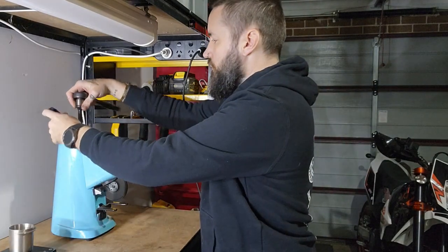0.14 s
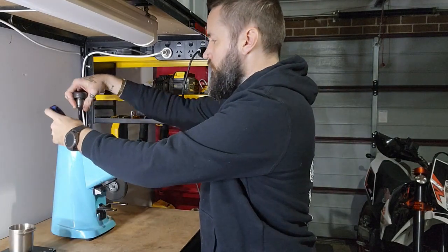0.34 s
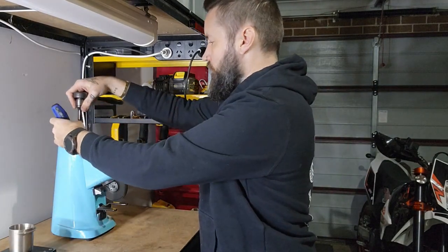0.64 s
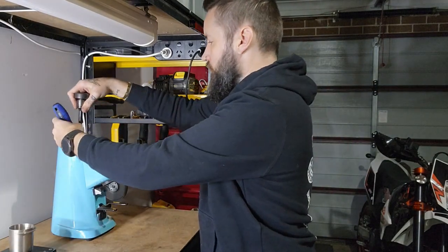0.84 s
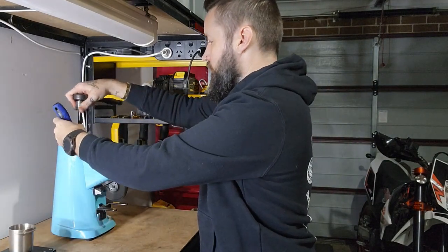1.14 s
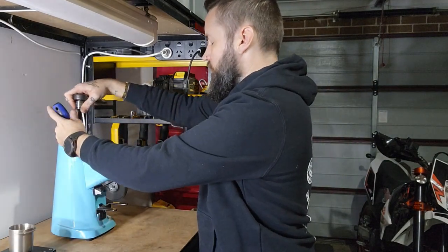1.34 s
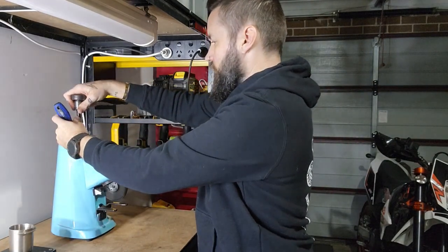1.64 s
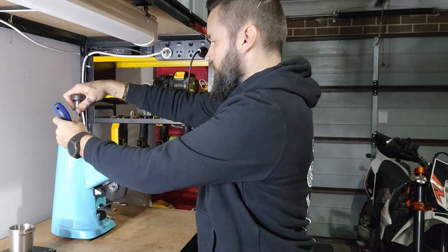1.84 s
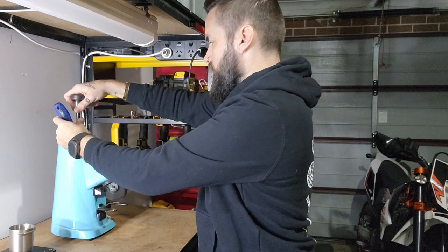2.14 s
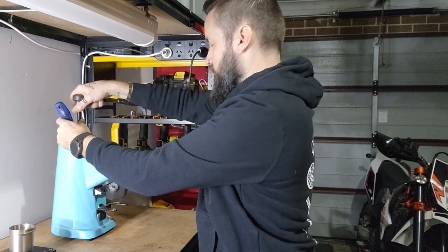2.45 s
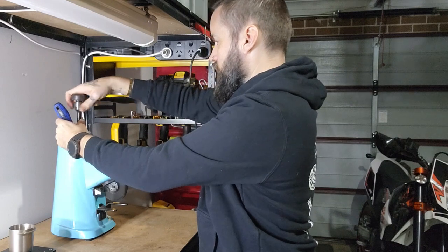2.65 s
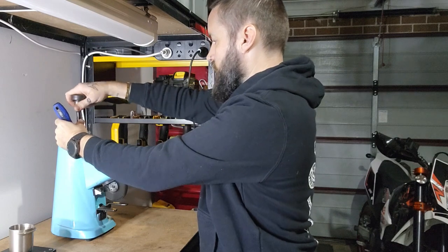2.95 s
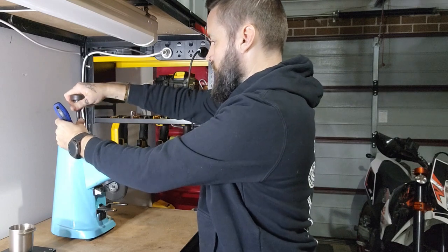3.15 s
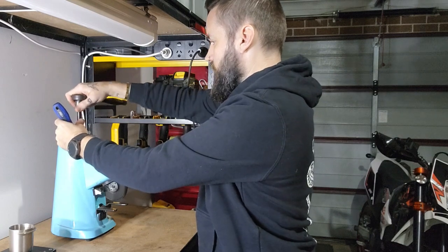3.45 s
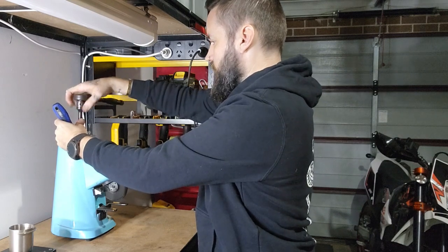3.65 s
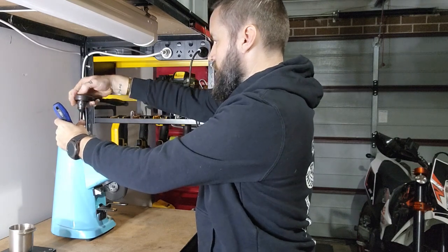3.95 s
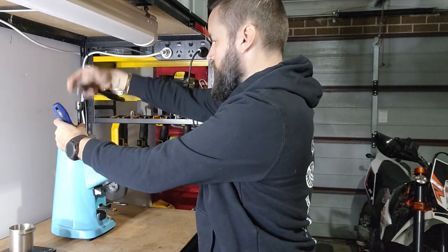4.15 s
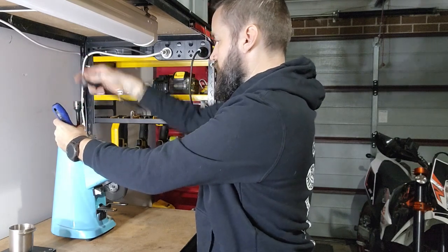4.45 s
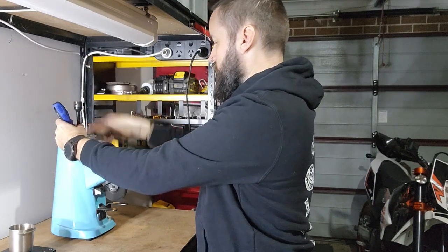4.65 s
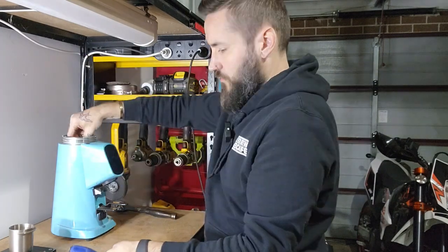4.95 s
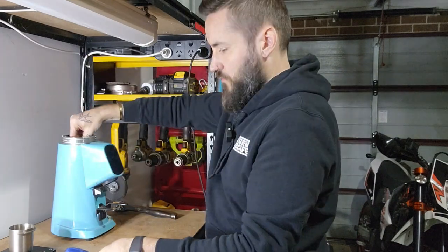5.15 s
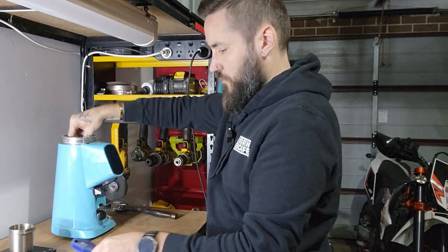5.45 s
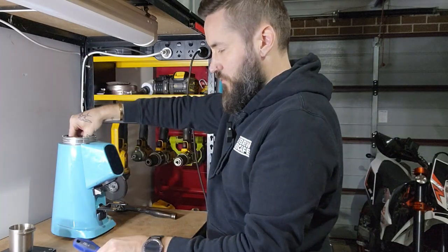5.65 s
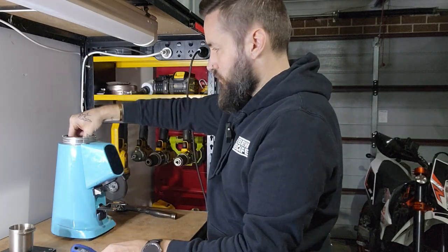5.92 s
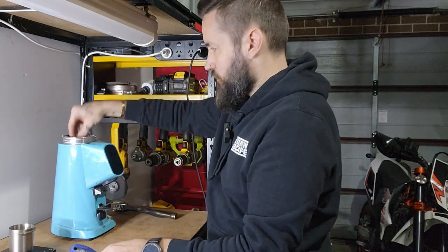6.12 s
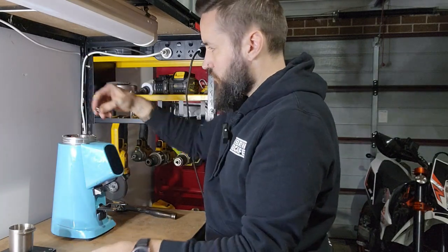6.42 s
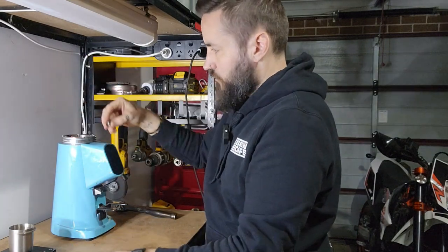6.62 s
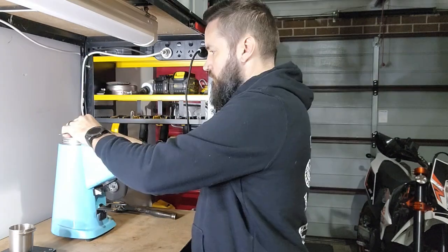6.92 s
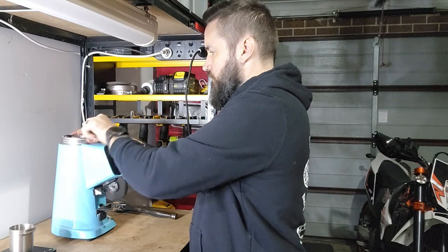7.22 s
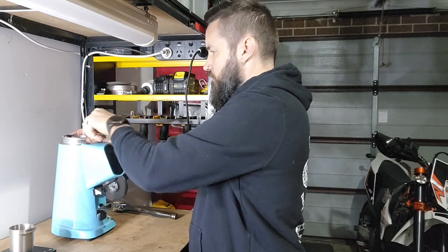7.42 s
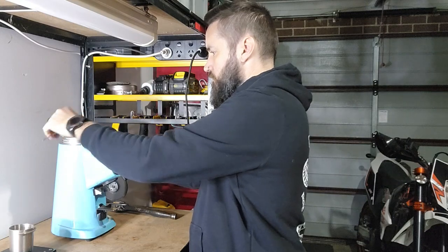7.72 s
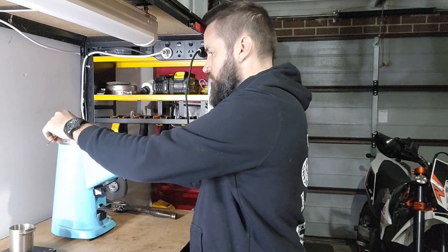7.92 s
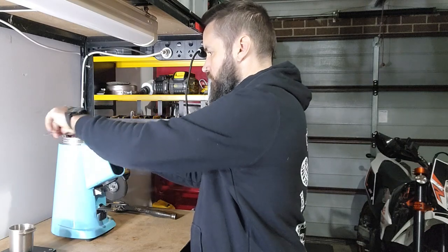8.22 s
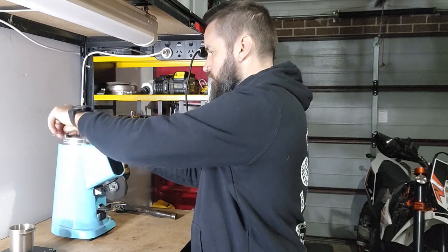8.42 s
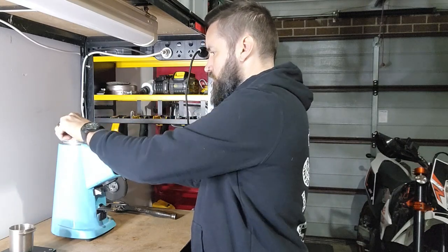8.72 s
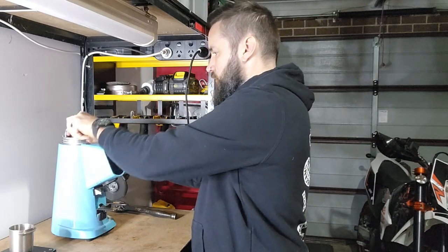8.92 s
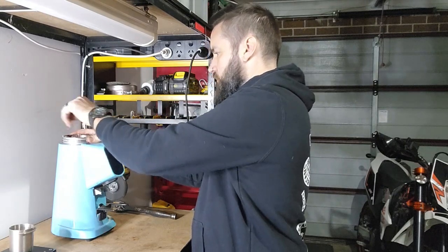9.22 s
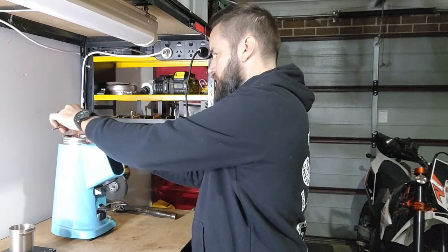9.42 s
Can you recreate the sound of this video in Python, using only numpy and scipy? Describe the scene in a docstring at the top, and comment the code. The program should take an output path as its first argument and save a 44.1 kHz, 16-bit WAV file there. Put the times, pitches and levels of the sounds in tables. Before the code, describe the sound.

Bursts of sharp metal rattling, two heavy padded thumps and several ringing clacks come from a grinder being dismantled on a workbench.

```python
"""A steel part rattles on its shaft, each hit a hard crack with a faint ring, as a coffee grinder is
taken apart on a garage bench. The hollow housing knocks while the part is rocked loose and lifted off.
Two loud, dull thumps follow, then the metal collar clacks against its seat as it is handled.
The part scrapes, fingers tick, tap and rub, and the garage echoes briefly over its own quiet air.
A limiter holds down the loudest blows."""
import sys
import numpy as np
from scipy import signal
from scipy.fft import rfft, irfft, next_fast_len
from scipy.io import wavfile
from scipy.ndimage import uniform_filter1d, minimum_filter1d, map_coordinates

SR = 44100
rng = np.random.default_rng(int(sys.argv[2]) if len(sys.argv) > 2 else 0)


def waveform_to_disk(signal):
    """Save audio, clipped to [-1, 1], as 16-bit WAV at the path in sys.argv[1]."""
    frames = np.transpose(np.atleast_2d(signal))
    scaled = np.clip(frames, -1, 1) * 32767
    samples = np.round(scaled).astype(np.int16)
    wavfile.write(sys.argv[1], SR, samples)


N = 422037
AGE = np.arange(SR * 2 // 3) / SR  # time since a blow [s]

# the loose part hits its shaft: (time [s], level [dB])
RATTLE_HITS = [(0.141, -10), (0.92, -2), (0.9605, 4), (0.9747, 0), (0.9978, 0), (1.055, -1.5),
               (2.5546, -4.5), (2.7291, 2), (2.796, -1), (2.8416, -0.5), (2.8931, 0), (2.9449, 6),
               (2.9642, -1.5), (2.9761, -1), (2.985, -1), (3.0107, -2.5), (3.04, -0.5), (3.0714, -2),
               (3.0845, -2.5), (3.1139, -0.5), (3.437, 3), (3.447, -4.5), (3.4560, -1), (3.4766, 0.5),
               (3.489, 0.5), (3.5009, -1.5), (3.5264, -3), (3.5537, -4.5), (3.6303, -12)]
# the collar clacks: (time [s], level [dB], treble [dB], bench shudder [dB], echo [dB])
COLLAR_CLACKS = [(6.6673, 1.5, 2, -30.5, -8), (7.046, 1, -0.5, -20, 0), (7.4758, -38.5, 5.5, -4, -6.5),
                 (7.9619, -25, 6, -16, -1), (7.9709, -20, 9.5, -26, -20), (8.2642, -21.5, -6, -16.5, -5.5),
                 (8.71, -6.5, 6, -28, 2.5), (8.8313, -1.5, -0.5, -26.5, 2), (9.5595, -24, 11, -22, 3.5)]
# the housing is knocked: (time [s], level [dB], centre of its ring [Hz])
HOUSING_KNOCKS = [(0.045, 0, 574.4), (0.137, -11, 634), (0.304, -14.5, 556), (0.318, -13, 615),
                  (0.607, -16.5, 568), (0.667, -22.5, 548), (0.734, -26.5, 606), (0.784, -16, 623),
                  (0.798, -15, 562), (0.824, -14, 563), (0.925, -13, 542), (0.996, -9.5, 587),
                  (1.315, -36, 585), (1.497, -19, 569), (1.526, -32, 637), (2.323, -5, 577),
                  (2.515, -32, 548), (3.336, -25.5, 542), (3.658, -23, 567), (4.482, -28.5, 536),
                  (4.593, -28.5, 545)]
# thumps inside the grinder: (time [s], level [dB], treble [dB], fade time [s], echo [dB])
DULL_THUMPS = [(5.2266, -0.5, -2, 0.15, -8), (5.840, 0, 6, 0.13, -3), (5.858, -7.5, 5, 0.056, 5.5),
               (5.49, -29.5, 1, 0.14, 2.5), (6.350, -29, 11.5, 0.018, -8), (7.419, -35, -27, 0.13, -0.5)]
# metal ticks under the fingers: (time [s], level [dB], treble [dB], seat ring [dB])
METAL_TICKS = [(0.048, -11.5, -6, 1), (0.7957, -23, 2.5, -20), (0.825, -15, -4.5, -10),
               (1.5266, -20.5, 8, 5), (1.8508, -33, -10, -2.5), (2.323, -18.5, -15.5, 2.5),
               (2.797, -7, -2.5, 8.5), (3.6261, -20.5, 2.5, 6), (3.9023, -25, 9, -12),
               (4.5196, -23, -0.5, -5), (4.5608, -28.5, 1.5, -21), (4.5937, -20.5, -7, 16),
               (4.6353, -27, -11, -11.5), (4.997, -31, 13.5, -16), (5.0453, -39, 18, -19),
               (5.4367, -24, -14, 0)]
# soft fingertip taps: (time [s], level [dB])
FINGER_TAPS = [(4.313, -34), (4.744, -35), (7.937, -38), (8.213, -41), (8.505, -24.5), (8.607, -24.5),
               (8.807, -26), (9.09, -30)]
# the part scrapes on its seat: (start [s], length [s], level [dB], treble [dB], seat ring [dB])
SEAT_SCRAPES = [(0.284, 0.089, -40, -0.5, 8.5), (0.39, 0.066, -56.5, 4, 12), (0.588, 0.11, -52.5, 5.5, 5.5),
                (0.766, 0.097, -45.5, 7, 15), (1.422, .22, -52, -5, -10), (4.108, 0.064, -34.5, -9.5, -5),
                (4.265, 0.059, -50, -9, -5.5), (4.476, 0.087, -45.5, -8, -6), (4.629, 0.031, -40, -5, -12),
                (4.918, 0.055, -41.5, -6, -2), (5.039, 0.036, -47, 1.5, 25), (5.089, 0.14, -51.5, -8, -2.5),
                (5.424, 0.1, -49, -7, -7.5), (5.735, .10, -52, 0.5, -4)]
# a hand slides over the parts: (start [s], length [s], level [dB])
HAND_STROKES = [(-0.1, 0.41, -35), (0.25, .3, -44.5), (0.573, 0.6, -36.5), (1.327, 0.31, -49.5),
                (1.465, 0.26, -43.5), (2.294, 0.44, -47), (2.691, .42, -38), (3.315, 0.51, -44),
                (4.108, 0.37, -53.5), (4.432, 0.28, -42), (4.662, 0.24, -49.5), (5.24, 0.37, -36),
                (5.572, 0.25, -45), (5.71, 0.33, -32), (6.362, .4, -64), (7.051, 0.33, -47),
                (7.363, 0.19, -62), (8.267, 0.3, -62.5), (8.443, 0.2, -47), (8.797, 0.42, -50),
                (9.335, 0.19, -57.5)]

# A sound's colour is how strong it is from bass to treble. Each lists (frequency [Hz], level [dB]).
STEEL_COLOUR = [(250, -38), (420, -26), (600, -5.5), (800, -16), (1200, -6), (1700, -11.5), (2450, -4),
                (2800, -5.5), (3300, 1.5), (4500, -2), (6300, -4.5), (7800, -10), (11200, -11),
                (16000, -26.5)]  # steel hitting steel
COLLAR_COLOUR = [(180, -31.5), (400, -6.5), (780, -18.5), (1150, -8), (1600, -12), (2450, -8), (3550, -4),
                 (4100, 2), (4750, -5.5), (5500, -10.5), (7600, -14), (9500, -26.5), (12200, -19),
                 (16000, -42)]  # the collar hitting its seat
KNOCK_COLOUR = [(40, -30), (90, -5), (160, -6.5), (380, -13), (600, 9.5), (850, -14), (1200, -6),
                (1800, -34.5), (4000, -30), (10000, -48)]  # the thud of the housing
THUMP_COLOUR = [(24, -41), (40, -32.5), (138, -2.5), (213, -11.5), (343, -1), (425, -8), (514, 2.5),
                (668, -11.5), (829, -12.5), (956, -12), (1430, -25.5), (1700, -27.5), (1820, -33),
                (2540, -40), (12000, -65.5), (15600, -84.5), (22000, -120)]  # a padded blow
SHUDDER_COLOUR = [(30, -25.5), (65, -8.5), (120, 0), (170, 5.5), (260, -4.5), (370, -10.5), (600, -6),
                  (1000, -19.5), (3000, -52.5)]  # the shaken bench
TICK_COLOUR = [(200, -12), (700, 2.5), (1300, -0.5), (2000, 3), (4500, 0.5), (8000, -10.5), (12000, -21),
               (16000, -31)]  # a light touch of metal
TAP_COLOUR = [(100, 5), (350, -14), (580, 13.5), (800, -7), (1500, -40), (5000, -44.5)]  # a fingertip landing
RUMBLE_COLOUR = [(35, -45.5), (70, -13.5), (155, -2), (240, -4), (370, -2.5), (440, -9), (555, -1.5),
                 (800, -13.5), (1150, -14), (1500, -21.5), (2500, -30.5), (5000, -69)]  # the rubbed housing
HISS_COLOUR = [(800, -11.5), (1500, 0.5), (4000, 4), (7000, -4.5), (10000, -8.5), (16000, -21)]  # sliding skin
ECHO_COLOUR = [(100, 0.5), (500, 0.5), (2000, -6), (6500, -6.5), (9000, -9), (15000, -5.5)]  # what the garage does to a blow's colour
AIR_COLOUR = [(22, -36), (40, -12.5), (62, 10), (100, 3), (200, -7), (430, -17.5), (545, -14.5), (900, -15),
              (2000, -22), (3430, -20), (6500, -23), (8140, -35.5), (14800, -39.5), (16000, -49.5)]  # still air in the garage

# The tones each object rings with: (frequency [Hz], level [dB], fade time [s])
STEEL_TONES = [(1196, -13, .15), (2510, -5, .33), (2760, -8, .3), (3250, 0.5, 0.22), (3440, -4.5, .26),
               (3620, -2.5, 0.34), (4300, -3, 0.2), (4704, -6.5, 0.22), (5360, -5.5, 0.18),
               (5970, -8.5, .2), (6460, -3.5, 0.18), (7100, -12.5, 0.14), (9100, -15, 0.25),
               (11040, -14, .16)]
COLLAR_TONES = [(1090, -10, 0.15), (2390, -12.5, 0.22), (4087, -5.5, 0.2), (4075, -9.5, .3),
                (4230, -4.5, 0.22), (4430, -12, .3), (5000, -9, .22), (6800, -8, .22), (7400, 0, 0.1),
                (12030, -12, 0.16)]
HOUSING_TONES = [(158, -24.5, 0.31), (221, -26.5, 0.12), (279, -28.5, 0.26), (397, -30, 0.29),
                 (541, -7.5, 0.069), (605.3, -2, 0.051), (1166, -19, 0.1), (1180, -11.5, 0.021)]
SEAT_TONES = [(687, -2, 0.038), (1218.5, 4.5, 0.042), (2256, -9.5, 0.025), (4660, -11.5, 0.022),
              (7450, -18.5, 0.024)]
BENCH_TONES = [(113, -1, 0.15), (154.6, -1, 0.97), (206, -5, 0.3), (362, -4, 0.25), (393, -1, 0.55)]
# how long the garage echoes: (frequency [Hz], fade time [s])
ECHO_FADE_TIMES = [(100, 0.61), (500, 0.2539), (2000, 0.52), (4000, 0.333), (8000, 0.39), (15000, 0.25)]


def steel_rattle():
    """Steel hits steel, damped by the hand: a crack, brighter when harder, then a faint lasting ring."""
    out = np.zeros(N)
    for time, db in RATTLE_HITS:
        treble_db = 0.18 * db + rng.normal(0, 1)
        crack = full_scale(coloured(burst(0.028), STEEL_COLOUR, treble_db, pivot_hz=5000))
        metal = amp(-23) * ring(STEEL_TONES, scatter_db=4, detune=0.0011, rise_s=0.00023)
        blow = crack + amp(-38.5) * bench_shudder(fade_s=0.87)
        add(out, time, amp(db) * (metal + in_garage(blow, echo_db=-8)))
    return out


def collar_clacks():
    """The collar snaps against its seat, rings faintly and shakes the bench."""
    out = np.zeros(N)
    for time, db, treble_db, shudder_db, echo_db in COLLAR_CLACKS:
        crack = full_scale(coloured(burst(0.028), COLLAR_COLOUR, treble_db, pivot_hz=4580))
        metal = amp(-20) * ring(COLLAR_TONES, scatter_db=2, detune=0.003, rise_s=0.0003)
        blow = crack + amp(shudder_db) * bench_shudder(fade_s=0.29)
        add(out, time, amp(db) * (metal + in_garage(blow, echo_db)))
    return out


def housing_knocks(usual_hz=585.1, near_hz=100, contact_s=0.0012):
    """The part is rocked, and each knock rings the hollow housing a little higher or lower."""
    out = np.zeros(N)
    soft_start = 1 - np.exp(-AGE / contact_s)
    for time, db, centre_hz in HOUSING_KNOCKS:
        thud = full_scale(coloured(burst(0.07), KNOCK_COLOUR))
        shift_hz = centre_hz - usual_hz
        tones = [(hz + shift_hz if abs(hz - usual_hz) < near_hz else hz, tone_db, fade_s)
                 for hz, tone_db, fade_s in HOUSING_TONES]
        hollow = ring(tones, scatter_db=1.5, detune=0.0027, rise_s=0.0051)
        knock = full_scale((hollow + amp(-6) * thud) * soft_start)
        add(out, time, amp(db) * in_garage(knock, echo_db=-9, rise_s=0.025, edge_count=220))
    return out


def dull_thumps():
    """Heavy, padded blows with no clear pitch; the bench booms under them."""
    out = np.zeros(N)
    for time, db, treble_db, fade_s, echo_db in DULL_THUMPS:
        thud = full_scale(coloured(burst(fade_s), THUMP_COLOUR, treble_db, pivot_hz=700), window=400)
        boom = full_scale(coloured(burst(fade_s), SHUDDER_COLOUR), window=600)
        add(out, time, amp(db) * in_garage(thud + amp(-14) * boom, echo_db))
    return out


def bench_shudder(fade_s):
    """A blow travels through the grinder into the bench, which booms and rings low."""
    boom = full_scale(coloured(burst(fade_s), SHUDDER_COLOUR), window=600)
    return boom + amp(-6.5) * ring(BENCH_TONES, scatter_db=6.5, detune=0.004, rise_s=0.017)


def metal_tick(treble_db, ring_db):
    """A light touch of metal clicks and rings the seat."""
    click = full_scale(coloured(burst(0.05), TICK_COLOUR, treble_db, pivot_hz=6000))
    seat = ring(SEAT_TONES, scatter_db=2.5, detune=0.035, rise_s=0.00015)
    return in_garage(full_scale(click + amp(ring_db) * seat), echo_db=-5.5)


def finger_touches():
    """Fingers make the metal tick, and their soft tips tap on the parts."""
    out = np.zeros(N)
    for time, db, treble_db, ring_db in METAL_TICKS:
        add(out, time, amp(db) * metal_tick(treble_db, ring_db))
    for time, db in FINGER_TAPS:
        tap = full_scale(coloured(burst(0.025), TAP_COLOUR))
        add(out, time, amp(db) * in_garage(tap, echo_db=-7.5))
    for start, length, db in HAND_STROKES:
        time = start + length * rng.random()  # one faint stray tick somewhere in each stroke
        add(out, time, amp(db - 3.5) * metal_tick(treble_db=1.5, ring_db=-6))
    return out


def seat_scrapes(slips_per_s=700):
    """The part drags over its seat in a run of tiny, uneven slips that each ring the seat."""
    out = np.zeros(N)
    for start, length, db, treble_db, ring_db in SEAT_SCRAPES:
        swell = np.sqrt(arch(AGE / length))
        slipping = rng.random(len(AGE)) < slips_per_s / SR
        slips = swell * slipping * rng.standard_normal(len(AGE))
        grit = coloured(burst(0.0027), TICK_COLOUR)
        seat = ring(SEAT_TONES, scatter_db=4.5, detune=0.0067, rise_s=0.00019)
        one_slip = grit / np.linalg.norm(grit) + amp(ring_db) * seat / np.linalg.norm(seat)
        scrape = signal.fftconvolve(slips, one_slip)[:len(AGE)]
        scrape = coloured(scrape, [(1000, 0)], treble_db, pivot_hz=2520)  # flat colour: only the tilt
        scrape = unit(scrape) * np.sqrt(length / AGE[-1])  # strength about 1 while it lasts
        add(out, start, amp(db) * in_garage(scrape, echo_db=-5))
    return out


def hand_rubbing(resting_db=-63):
    """A hand speeds up and slows down; its tiny slips make the housing rumble and the skin hiss."""
    t = np.arange(N) / SR
    sliding = amp(resting_db + 3 * wobble(3))  # even a hand that only holds rumbles a little
    for start, length, db in HAND_STROKES:
        speed = arch((t - start) / length) ** 1.5
        sliding += amp(db) * speed
    slips_db = 2.6 * wobble(45)
    rumble = unit(coloured(rng.standard_normal(N) * amp(slips_db), RUMBLE_COLOUR))
    grainy_noise = rng.standard_normal(N) * amp(0.7 * slips_db + 2.5 * wobble(770))
    hiss = unit(coloured(grainy_noise, HISS_COLOUR))
    hiss_gain = amp(-31.5) * sliding ** 0.63  # grows more slowly than the rumble
    return sliding * rumble + hiss_gain * hiss


def in_garage(blow, echo_db, rise_s=0.0012, edge_count=72):
    """A blow plus its echo from the garage walls: a short wash of noise in which deep bass lasts longest."""
    hz, t, noise = signal.stft(rng.standard_normal(len(AGE)), SR, nperseg=256)
    decay = np.exp(-np.log(1000) * t / value_at(ECHO_FADE_TIMES, hz)[:, None])
    echo = signal.istft(noise * decay, SR, nperseg=256)[1][:len(AGE)]
    echo *= 1 - np.exp(-AGE / rise_s)
    # the walls gather sound sent in all directions, so the echo keeps only the blow's broad colour
    edges_hz = np.geomspace(20, SR / 2, edge_count)
    edge_bins = edges_hz * len(blow) / SR
    energy = np.cumsum(np.abs(rfft(blow)) ** 2)
    band_power = np.diff(np.interp(edge_bins, np.arange(len(energy)), energy)) / np.diff(edge_bins)
    centres_hz = np.sqrt(edges_hz[1:] * edges_hz[:-1])
    colour_db = 10 * np.log10(np.abs(band_power) + 1e-6) + value_at(ECHO_COLOUR, centres_hz)
    echo = coloured(echo / np.linalg.norm(echo), np.transpose([centres_hz, colour_db]))
    return blow + amp(echo_db) * echo


def garage_air():
    """The still air of the garage: a faint, steady, low noise."""
    return amp(-58) * unit(coloured(rng.standard_normal(N), AIR_COLOUR))


def burst(fade_s):
    """The crowded vibrations of a contact: noise that dies away."""
    return rng.standard_normal(len(AGE)) * fade(fade_s)


def ring(tones, scatter_db, detune, rise_s):
    """Each blow rings an object's tones at new strengths and a touch higher or lower."""
    sound = np.zeros(len(AGE))
    for hz, db, fade_s in tones:
        strength, shift, phase = rng.standard_normal(3)
        wave = np.sin(2 * np.pi * hz * (1 + detune * shift) * AGE + np.pi * phase)
        sound += amp(db + scatter_db * strength) * fade(fade_s) * wave
    return full_scale(sound * (1 - np.exp(-AGE / rise_s)))


def coloured(x, colour, treble_db=0, pivot_hz=4000):
    """Give x a colour; treble_db lifts the sound above the pivot and lowers it below."""
    size = 2 * next_fast_len(len(x) // 2 + 2048)
    hz = np.fft.rfftfreq(size, 1 / SR)
    tilt_db = treble_db * np.tanh(np.log((hz + 1) / pivot_hz))
    # folding the cepstrum (the log spectrum turned into time) keeps sound from coming before its blow
    cepstrum = irfft(np.log(amp(value_at(colour, hz) + tilt_db)))
    cepstrum[1:size // 2] *= 2
    cepstrum[size // 2 + 1:] = 0
    return irfft(rfft(x, size) * np.exp(rfft(cepstrum)))[:len(x)]


def fade(fade_s):
    """Die away by 60 dB in the fade time."""
    return np.exp(-np.log(1000) * AGE / fade_s)


def arch(progress):
    """Rise from 0 to 1 and fall back as progress goes from 0 to 1."""
    return np.abs(np.sin(np.pi * np.clip(progress, 0, 1)))


def wobble(turns_per_s):
    """A smooth curve through this many random points a second."""
    points = rng.standard_normal(int(N * turns_per_s / SR) + 4)
    return map_coordinates(points, [np.arange(N) * turns_per_s / SR])


def value_at(table, hz):
    """Read between the rows of a (frequency, value) table, with octaves evenly spaced."""
    table_hz, values = np.transpose(table)
    return np.interp(np.log(hz + 1), np.log(table_hz), values)


def amp(db):
    """Turn decibels into a gain."""
    return 10 ** (np.asarray(db) / 20)


def unit(x):
    """Scale to an average strength (rms) of 1."""
    return x / np.sqrt(np.mean(x ** 2) + 1e-20)


def full_scale(x, window=176):
    """Scale a blow to peak near 1, taking the peak as twice its loudest rms over window samples."""
    return x / (2 * np.sqrt(uniform_filter1d(x ** 2, window).max()))


def add(track, time, x):
    """Mix x into the track at a time in seconds."""
    part = track[max(round(time * SR), 0):][:len(x)]
    part += x[:len(part)]


def scene():
    """All the handling sounds over the air of the garage, in one channel."""
    blows = steel_rattle() + collar_clacks() + housing_knocks() + dull_thumps()
    return (blows + finger_touches() + seat_scrapes() + hand_rubbing() + garage_air())[None]


def record(dry, ceiling_db=-1.6, low_cut_hz=48, top_hz=16100):
    """The microphone drops deep bass, a fast limiter turns down peaks, and the highest treble is cut."""
    low_cut = signal.butter(3, low_cut_hz, "highpass", fs=SR, output="sos")
    heard = signal.sosfilt(low_cut, dry)
    needed_gain = np.minimum(1, amp(ceiling_db) / (np.abs(heard) + 1e-9))
    smooth_gain = uniform_filter1d(minimum_filter1d(needed_gain, size=67), size=45)
    size = next_fast_len(N + SR)
    top_cut = 1 / (1 + (np.fft.rfftfreq(size, 1 / SR) / top_hz) ** 120)
    return irfft(rfft(heard * smooth_gain, size) * top_cut, size)[:, :N]


dry = scene()
out = record(dry)
waveform_to_disk(out)
```